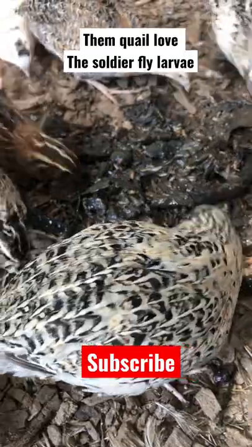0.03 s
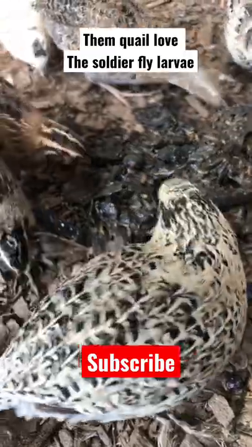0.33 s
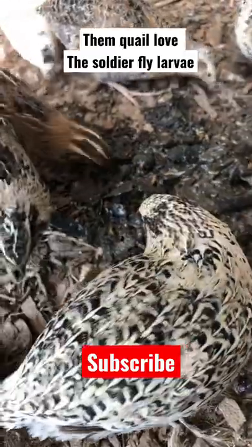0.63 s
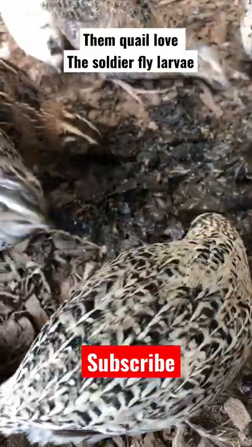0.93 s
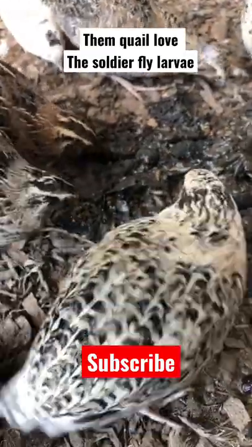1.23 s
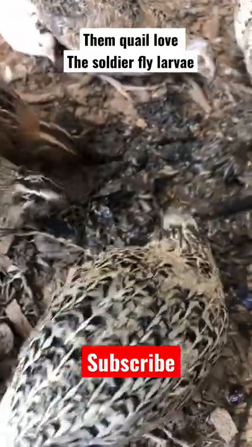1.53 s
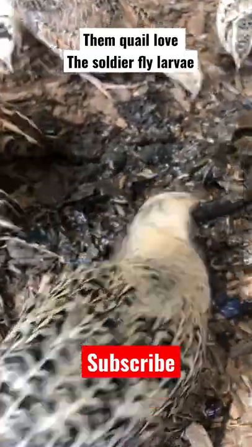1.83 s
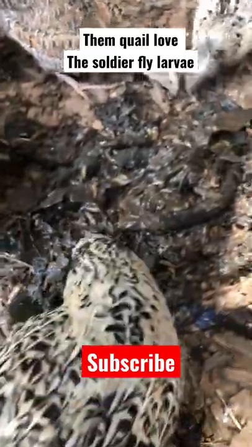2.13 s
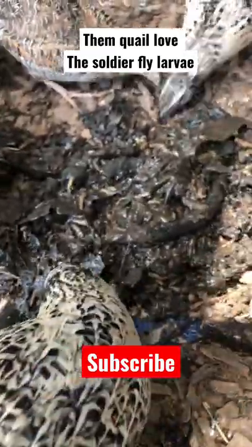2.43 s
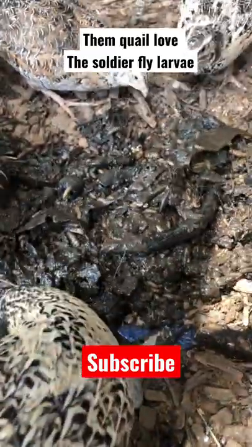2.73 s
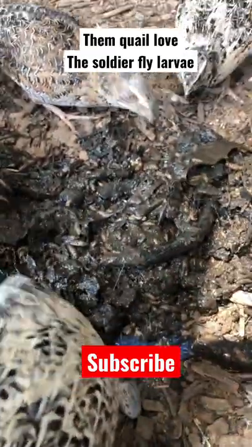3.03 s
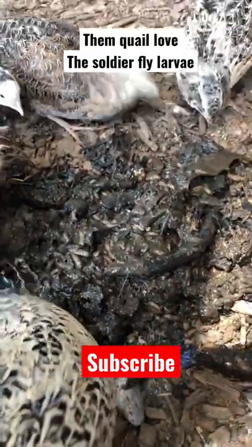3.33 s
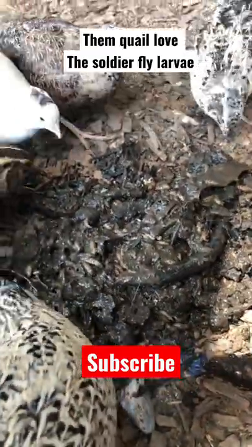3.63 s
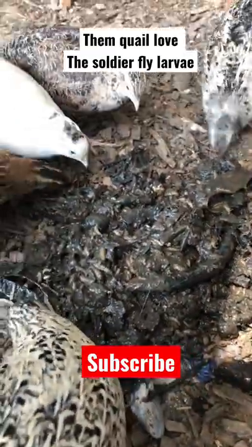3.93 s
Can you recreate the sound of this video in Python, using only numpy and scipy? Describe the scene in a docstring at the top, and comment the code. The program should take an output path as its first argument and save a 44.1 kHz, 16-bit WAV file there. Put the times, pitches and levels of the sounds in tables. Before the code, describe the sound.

A quail calls close by in an outdoor pen, after three seconds of faint pecks and scuffs in damp litter, with one tiny, farther peep around 1.2 seconds. A soft note comes at about 3.1 seconds, a sharp chip at 3.2, then a loud, harsh, pulsed trill from 3.3 to 3.6, ringing briefly. A distant motor hum and outdoor air stay low throughout.

```python
"""A quail close by in a pen gives a soft note, a sharp chip and a harsh trill.
Each harsh syllable is a high rasp, made by its voice organ shaking chaotically, that drops into a
clean falling whistle; most start with a low tone. The pen rings and nearby surfaces throw it back.
Other quail peck and scuff at damp litter and one peeps, over a distant motor's hum and outdoor air."""
import sys
import numpy as np
from scipy import signal
from scipy.fft import rfft, irfft
from scipy.io import wavfile
from scipy.ndimage import uniform_filter1d

SR = 44100
rng = np.random.default_rng(int(sys.argv[2]) if len(sys.argv) > 2 else 0)


def wav_record(signal):
    """Record a signal, one row per channel, as 16-bit PCM in the file named by sys.argv[1]."""
    frames = np.transpose(np.atleast_2d(signal))
    bounded = np.clip(frames, -1, 1)
    # unit amplitude maps onto the largest positive 16-bit level
    quanta = np.round(bounded * 32767).astype(np.int16)
    wavfile.write(sys.argv[1], SR, quanta)


N = 4 * SR
TOP_HZ = 16200  # upper edge of the treble

# tones in the motor's hum: f/Hz, start level/dB, end level/dB
MOTOR_TONES = [(58.8, -50, -56), (80, -46.5, -41.5), (118.7, -43, -44.5), (159.1, -48.5, -49),
               (177.3, -57, -57.5), (199, -60, -58), (236, -55, -52), (320, -71.5, -70.5),
               (349.7, -62, -62.5), (596, -70, -69.5)]
# slow dip of the whole hum: t/s, level/dB
MOTOR_DIP = [(0, -0.5), (1.0, -1), (1.6, -1.5), (2.1, -1.5), (2.7, 0), (4, 0)]
# tone color of the outdoor air: f/Hz, level/dB
OUTDOOR_SPECTRUM = [(20, -47.5), (38, -13.5), (58, 4), (80, -2), (110, -3.5), (180, -5), (260, -15),
                    (360, -17), (470, -26.5), (640, -20.5), (1000, -20.5), (1500, -24.5), (2400, -33.5),
                    (4000, -37.5), (6300, -42.5), (10000, -51.5), (16000, -60)]
# pecks and snaps of litter: t/s, level/dB, ring f/Hz, ring time/s
LITTER_PECKS = [(0.0207, -44.5, 6950, 0.00052), (0.0863, -40, 5600, 0.001), (.1196, -44, 4020, .0018),
                (.149, -48, 5860, 0.0014), (.176, -29, 5630, 0.00069), (.1835, -48, 9500, 0.00072),
                (.515, -45, 11000, .0005), (.537, -48, 5200, 0.0014), (0.6568, -35.5, 10000, 0.00029),
                (0.664, -45, 9000, .0005), (0.753, -44, 10900, 0.00077), (0.8025, -47.5, 6700, .0012),
                (.8245, -41.5, 10800, 0.00088), (.831, -47.5, 3170, 0.0037), (0.8872, -48.5, 3800, 0.0023),
                (1.041, -40, 7900, 0.00038), (1.1069, -32, 3850, .0005), (1.109, -43, 11200, 0.00037),
                (1.1618, -39, 2880, 0.001), (1.2186, -39, 3200, .0005), (1.231, -36, 3380, 0.00055),
                (1.5299, -41, 3820, 0.0011), (1.6846, -42.5, 9900, 0.00036), (2.4528, -41.5, 5630, 0.00049),
                (2.5063, -47, 9500, 0.00066), (2.520, -38, 8600, 0.00044), (2.797, -47.5, 5430, 0.0019),
                (2.8754, -43.5, 8250, 0.00082), (2.9243, -53, 5150, 0.0015), (3.0325, -41.5, 3020, 0.0011),
                (3.295, -37, 6000, .0004), (3.3755, -25.5, 9800, 0.00059)]
# feet scuffing the litter: middle t/s, half-length/s, level/dB
FOOT_SCUFFS = [(.07, .05, -58), (1.237, .015, -56), (1.453, 0.026, -49.5), (1.95, .015, -53),
               (2.10, .03, -57), (2.42, .03, -57)]
# a farther bird's peep: t/s, f/Hz, level/dB
PEEP_CURVE = [(1.177, 1863, -58), (1.189, 2413, -61), (1.203, 1844, -61), (1.222, 2164, -54),
              (1.245, 2480, -59), (1.254, 2240, -71)]
# its harmonics (tones at 1, 2, 3... times the pitch): level/dB
PEEP_HARMONICS = [0, -16, -16]
# breath in the peep, the soft note and the low tones: f/Hz, level/dB
BREATH_SPECTRUM = [(400, -26.5), (650, -5), (950, -12), (1330, 13.5), (1800, 15.5), (2700, 13.5),
                   (3600, -8.5), (4700, -2), (5800, -11), (6800, -6.5), (7700, -1.5), (8600, -13.5),
                   (9700, -15), (10700, -15), (12000, -20), (16000, -17.5)]
# the close bird's soft note: t/s, f/Hz, level/dB
SOFT_CURVE = [(3.051, 690, -50), (3.0555, 960, -34.5), (3.060, 1199, -28), (3.069, 1250, -35.5),
              (3.077, 1130, -32), (3.085, 1095, -31), (3.093, 1020, -47), (3.101, 1000, -45),
              (3.105, 966, -66)]
# its harmonics: start level/dB, end level/dB
SOFT_HARMONICS = [(-15.5, -0.5), (1.5, -22.5), (-26, -18), (-17.5, -20.5), (-26, -19), (-23.5, -29.5),
                  (-35.5, -30.5), (-17.5, -40.5), (-43, -27), (-35.5, -48)]
# low tones that lead into the rasps: t/s, length/s, first f/Hz, settled f/Hz, level/dB
LOW_TONES = [(3.173, 0.023, 1410, 1498, -23.5), (3.218, 0.021, 1500, 1423, -28),
             (3.3146, 0.028, 2600, 1501, -17.5), (3.374, .015, 1550, 1500, -20),
             (3.417, 0.0067, 1600, 1780, -17.5), (3.455, 0.017, 1856, 2510, -12.5),
             (3.500, 0.019, 1880, 2270, -15.5)]
# their harmonics: level/dB
LOW_HARMONICS = [0, -20, -35]
# thin, high overtones: middle t/s, f/Hz, fall/(octaves per s), half-length/s, level/dB
HIGH_SQUEALS = [(3.205, 10630, -2, 0.0086, -44.5), (3.209, 7600, -3.5, 0.0052, -42),
                (3.228, 6630, 1, .0025, -36.5), (3.338, 6860, 11.5, .004, -37.5),
                (3.380, 7020, 10.5, 0.0061, -38), (3.423, 7450, 10, 0.0039, -38),
                (3.465, 7600, 26, .003, -43), (3.476, 4400, 66.5, 0.0021, -23)]
# harsh syllables: the whistle's t/s, f/Hz, fall/(octaves per s), half-length/s, level/dB,
# then the rasp's length/s, f/Hz, level/dB
HARSH_SYLLABLES = [(3.2114, 2242, 80, .0036, -6, 0.017, 3200, -16.5),
                   (3.369, 1915, 65, .0028, -7.5, 0.029, 3350, -19),
                   (3.413, 1892, 28, 0.003, -4.5, .029, 3350, -18),
                   (3.453, 2020, 36.5, 0.005, -6.5, .030, 3300, -17),
                   (3.4963, 1942, 19.7, 0.0044, -8, .030, 3400, -19),
                   (3.538, 2130, 39.3, 0.007, -15, .029, 3350, -18),
                   (3.565, 2765, 10.36, 0.0054, -20.5, .023, 3300, -19.5),
                   (3.593, 2790, 14, 0.0053, -27.5, .024, 3250, -24.5)]
# rushing air in the rasps and whistles: f/Hz, level/dB
RUSH_SPECTRUM = [(300, -53), (480, -50.5), (640, -10.5), (850, -24), (1100, -19.5), (1400, -4), (2000, 2),
                 (2650, 4.5), (3100, 0), (3700, 3.5), (4300, -9.5), (5100, -7), (5800, -19), (7500, -23),
                 (8400, -31), (11000, -29.5), (12500, -36), (16000, -38.5)]
# how long the yard echoes: f/Hz, time to fade by 60 dB/s
YARD_FADE = [(300, .4), (1500, .44), (2600, .47), (3600, .33), (4800, .28), (6800, 0.16), (12000, .16)]
# echoes off nearby surfaces: delay/s, level/dB
NEAR_ECHOES = [(.00204, -12.5), (.00494, -13), (.00819, -23.5), (0.017, -15), (.0195, -27)]
# ringing of the pen: f/Hz, level/dB, time to fade by 60 dB/s
PEN_RINGS = [(1310, 15.5, .16), (1515, -2, 0.24), (2137, -0.5, .16), (2350, -7.5, .12), (2605, -7.5, 0.2),
             (2840, 2.5, 0.4), (4900, -2.5, .35)]


def gain(db):
    """Turns decibels into a number to multiply by."""
    return 10 ** (np.asarray(db) / 20)


def unit_rms(x):
    """Scales a signal so that its average strength (rms) is 1."""
    return x / np.sqrt(np.mean(x ** 2) + 1e-20)


def look_up(table, hz):
    """Reads between a table's rows, with frequency spaced by octaves."""
    f, value = np.transpose(table)
    return np.interp(np.log(hz + 1), np.log(f + 1), value)


def add(mix, at, sound):
    """Mixes a sound in, starting `at` seconds."""
    part = mix[round(at * SR):][:len(sound)]
    part += sound[:len(part)]


def wobble(size, hz):
    """A smooth random wiggle, mostly slower than hz."""
    f = np.fft.rfftfreq(N, 1 / SR)
    return unit_rms(irfft(rfft(rng.standard_normal(N)) / (1 + (f / hz) ** 4), N))[:size]


def noise(spectrum, size=N):
    """Noise with the tone color of a table."""
    color = gain(look_up(spectrum, np.fft.rfftfreq(N, 1 / SR)))
    return unit_rms(irfft(rfft(rng.standard_normal(N)) * color, N))[:size]


def motor():
    """A distant motor hums with several low tones, each wavering in level and pitch."""
    t = np.arange(N) / SR
    hum = np.zeros(N)
    for hz, start_db, end_db in MOTOR_TONES:
        level = gain(np.linspace(start_db, end_db, N) + 1.5 * wobble(N, hz=4))
        hum += level * np.sin(2 * np.pi * (hz * t + rng.random()) + 0.38 * wobble(N, hz=2.2))
    return np.sqrt(2) * hum * gain(np.interp(t, *np.transpose(MOTOR_DIP)))


def outdoor_air(level_db=-45.5, patch_db=1.16):
    """Outdoor rumble and hiss, with patches that drift a little louder and softer."""
    bands = signal.stft(noise(OUTDOOR_SPECTRUM), nperseg=1024)[2]
    patches = uniform_filter1d(rng.standard_normal(bands.shape), size=24, axis=0)  # smooth over pitch
    patches = unit_rms(uniform_filter1d(patches, size=7, axis=1))  # and over time
    return gain(level_db) * signal.istft(bands * gain(patch_db * patches), nperseg=1024)[1][:N]


def snap(db, hz, ring_s, crack_s=0.00076, size=800):
    """Struck litter gives a crack and four ringing tones, closer in pitch the longer they last."""
    t = np.arange(size) / SR
    pitches = hz + 0.66 / ring_s * rng.standard_normal(4)
    rings = sum(np.sin(2 * np.pi * f * t) for f in pitches) / 3
    band = signal.butter(1, [hz / 1.3, min(hz * 1.3, TOP_HZ)], "band", fs=SR)
    crack = unit_rms(signal.lfilter(*band, rng.standard_normal(size)))
    return gain(db) * (rings * np.exp(-t / ring_s) + gain(-10) * crack * np.exp(-t / crack_s))


def pecking(ticks_per_s=60):
    """Beaks strike the litter, among many faint ticks as it shifts."""
    out = np.zeros(N)
    for at, db, hz, ring_s in LITTER_PECKS:
        add(out, at, snap(db, hz, ring_s))
    for when, faintness, pitch in rng.random((int(ticks_per_s * N / SR), 3)):
        db = -62 - 2.5 * np.log(faintness + .03)
        add(out, when * N / SR, snap(db, hz=3000 + 9000 * pitch, ring_s=0.00066))
    return out


def scuffing(snaps_per_s=600):
    """Each scuff of a foot is a brief clump of tiny snaps."""
    out = np.zeros(N)
    for middle, half_s, db in FOOT_SCUFFS:
        for when, strength, pitch in rng.random((int(2 * half_s * snaps_per_s), 3)):
            at = max(middle + half_s * (2 * when - 1), 0)
            add(out, at, strength * snap(db, hz=4000 + 8000 * pitch, ring_s=0.00046))
    return out


def voice(hz, harmonics_db):
    """A bird's tone: a stack of harmonics that follows a changing pitch."""
    phase = 2 * np.pi * np.cumsum(hz) / SR
    return np.sqrt(2) * sum(gain(db) * np.sin(k * phase) for k, db in enumerate(harmonics_db, 1))


def quiet_note(curve, harmonics_db, jitter):
    """A peep or soft note: a slightly shaky tone made husky by breath."""
    times, hz, db = np.transpose(curve)
    t = np.arange(times[0], times[-1], 1 / SR)
    pitch = np.interp(t, times, hz) * (1 + jitter * wobble(len(t), hz=500))
    start_db, end_db = harmonics_db
    tone = voice(pitch, np.linspace(start_db, end_db, len(t)).T)
    breath = gain(-16) * noise(BREATH_SPECTRUM, len(t))
    return times[0], gain(np.interp(t, times, db)) * (tone + breath)


def low_tone(start, length, first_hz, settled_hz, db, settle_s=0.0036, edge_s=0.0056, swell_s=0.048):
    """A low tone settles on its pitch and grows hissy before the voice breaks."""
    t = np.arange(0, length, 1 / SR)
    pitch = settled_hz + (first_hz - settled_hz) * np.exp(-t / settle_s)
    pitch *= 1 + 0.045 * wobble(len(t), hz=710)
    tone = gain(-10.5 * t / length) * voice(pitch, LOW_HARMONICS)
    hiss = gain(-3.5) * np.minimum(t / swell_s, 1) * noise(BREATH_SPECTRUM, len(t))
    shape = np.sin(np.pi / 2 * np.clip(np.minimum(t, length - t) / edge_s, 0, 1)) ** 2
    return start, gain(db) * shape * (tone + hiss)


def squeal(at, hz, fall, half_s, db):
    """A thin, wavering overtone glides past."""
    t = np.arange(-3 * half_s, 3 * half_s, 1 / SR)
    pitch = hz * 2 ** (-fall * t) * (1 + .032 * wobble(len(t), hz=1200))
    shape = np.exp(-.5 * (t / half_s) ** 2)
    return at + t[0], gain(db) * shape * voice(pitch, harmonics_db=[0])


def rasp(end, length, hz, db, edge_s=0.0043):
    """The voice organ (syrinx), driven high, shakes chaotically with a rush of air."""
    t = np.arange(0, length, 1 / SR)
    arch = .72 + .28 * np.sin(np.pi * (t / length) ** 0.696)  # the pitch rises, then drops
    pitch = hz * arch * (1 + .17 * wobble(len(t), hz=786))
    flutter = 1 + .3 * wobble(len(t), hz=504)
    tone = flutter * voice(pitch, harmonics_db=[0, -36])
    rush = gain(-6) * noise(RUSH_SPECTRUM, len(t))
    shape = np.clip(t / edge_s, 0, 1) * np.clip((length - t) / (2 * edge_s), 0, 1)
    return end - length, gain(db) * shape * unit_rms(tone + rush)


def whistle(at, hz, fall, half_s, db):
    """The clean falling whistle that ends a syllable: it swells, then shuts off."""
    t = np.arange(-2.5 * half_s, 2 * half_s, 1 / SR)
    pitch = hz * 2 ** (-fall * t) * (1 + 0.017 * wobble(len(t), hz=993))
    flutter = 1 + .12 * wobble(len(t), hz=590)
    tone = flutter * voice(pitch, harmonics_db=[-2.5, -42.5, -39, -44.5])
    rush = gain(-24.5) * noise(RUSH_SPECTRUM, len(t))
    steepness = np.where(t < 0, 2.2, 3.5)
    shape = np.exp(-.5 * abs(t / half_s) ** steepness)
    return at + t[0], gain(db) * shape * (tone + rush)


def quail_calls(cut_hz=540):
    """All the calls together; they hold almost nothing below cut_hz."""
    out = np.zeros(N)
    for at, hz, fall, half_s, db, rasp_s, rasp_hz, rasp_db in HARSH_SYLLABLES:
        add(out, *whistle(at, hz, fall, half_s, db))
        add(out, *rasp(at, rasp_s, rasp_hz, rasp_db))  # ends at the whistle's peak
    for row in LOW_TONES:
        add(out, *low_tone(*row))
    for row in HIGH_SQUEALS:
        add(out, *squeal(*row))
    add(out, *quiet_note(SOFT_CURVE, np.transpose(SOFT_HARMONICS), jitter=.022))
    add(out, *quiet_note(PEEP_CURVE, (PEEP_HARMONICS, PEEP_HARMONICS), jitter=.029))
    return signal.sosfilt(signal.butter(6, cut_hz, "high", fs=SR, output="sos"), out)


def pen_echoes(sound, delay_s=.005, scatter_s=0.084):
    """Sound bounces, scatters and rings inside the pen, and the yard adds a faint tail."""
    t = np.arange(SR) / SR
    drop = np.log(1000)  # exp(-drop) is 60 dB down
    scatter, tail = rng.standard_normal((2, SR))
    scatter *= (t > delay_s) * np.exp(-drop * t / scatter_s)
    hz, times, bands = signal.stft(tail * (t > 2 * delay_s), SR, nperseg=256)
    bands *= np.exp(-drop * times / look_up(YARD_FADE, hz)[:, None])
    tail = signal.istft(bands, SR, nperseg=256)[1][:SR]
    response = gain(-9.5) * scatter / np.linalg.norm(scatter) + gain(-24) * tail / np.linalg.norm(tail)
    for delay, db in NEAR_ECHOES:
        response[round(delay * SR)] += gain(db)
    for ring_hz, db, fade_s in PEN_RINGS:
        decay = drop / fade_s
        ring = np.exp(-decay * t) * np.cos(2 * np.pi * ring_hz * t)
        response += gain(db) * 2 * decay / SR * ring
    return signal.fftconvolve(sound, response)[:N]


def scene():
    """Quail call and feed in the pen, over the motor and the outdoor air."""
    calls = quail_calls()
    litter = pecking() + scuffing()
    echoes = pen_echoes(calls + gain(-4.5) * litter)
    return (calls + litter + echoes + motor() + outdoor_air())[None]


def record(dry):
    """Cuts off the very highest treble."""
    low_pass = signal.firwin(511, TOP_HZ, window=("kaiser", 9), fs=SR)
    return signal.oaconvolve(dry, low_pass[None], "same")


dry = scene()
out = record(dry)
wav_record(out)
```